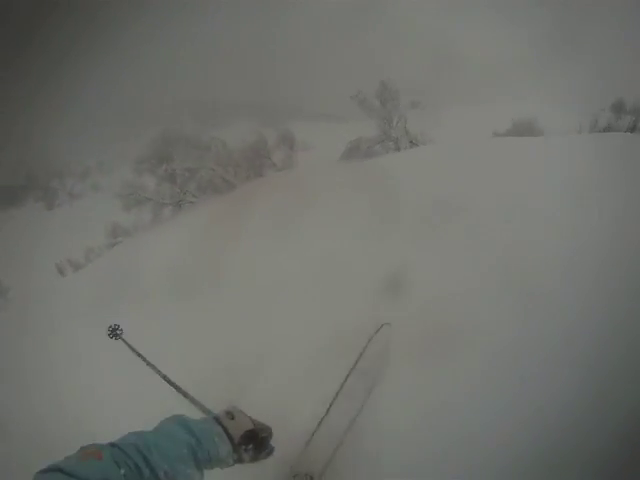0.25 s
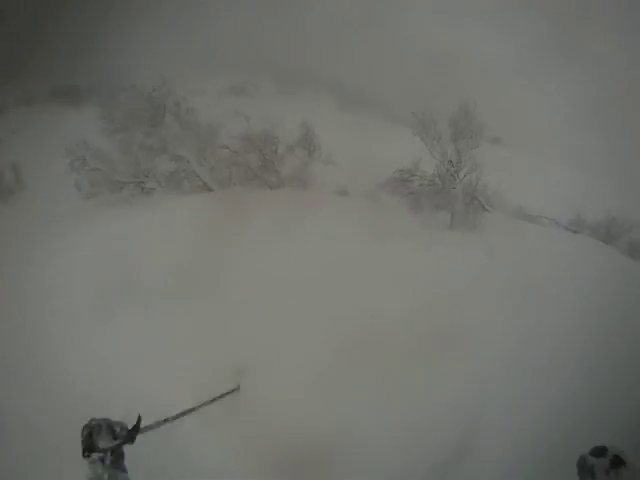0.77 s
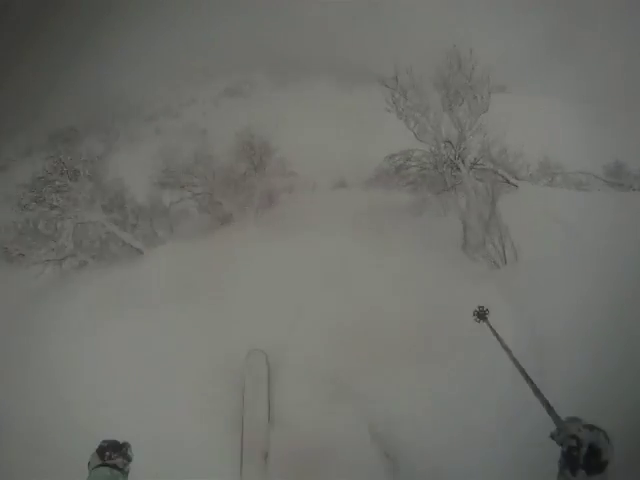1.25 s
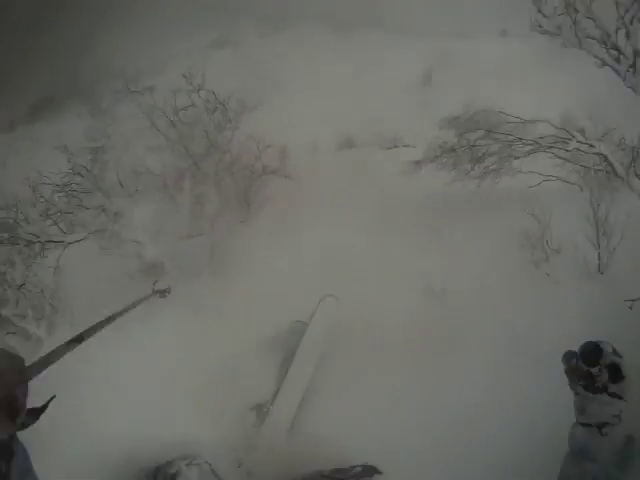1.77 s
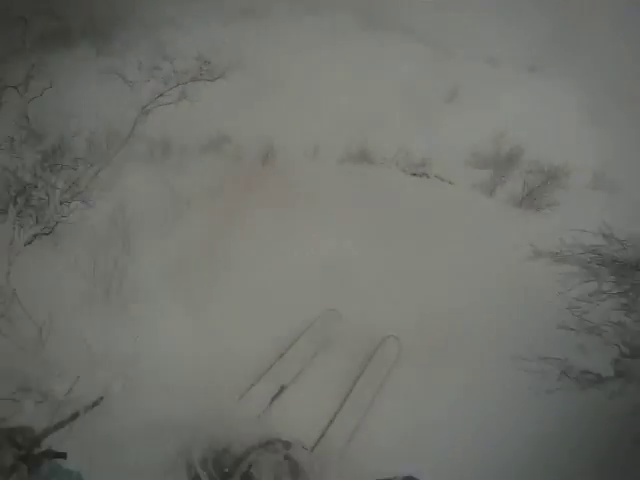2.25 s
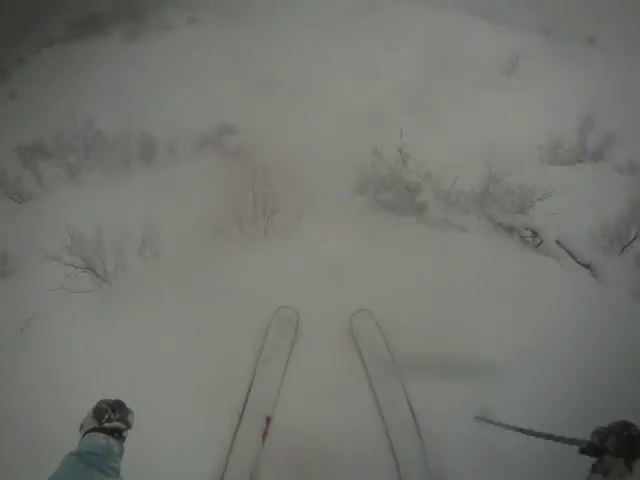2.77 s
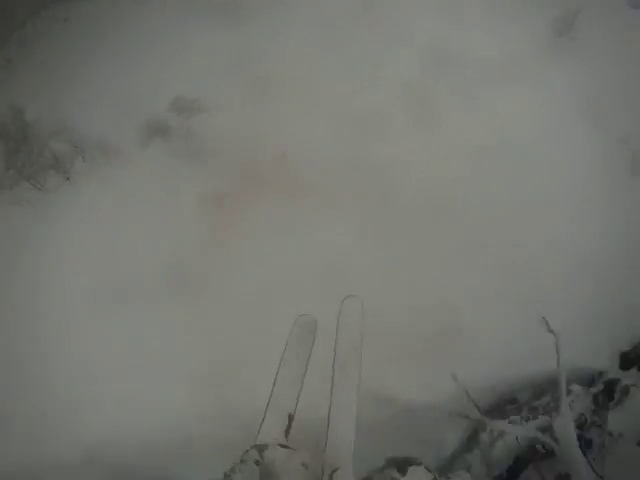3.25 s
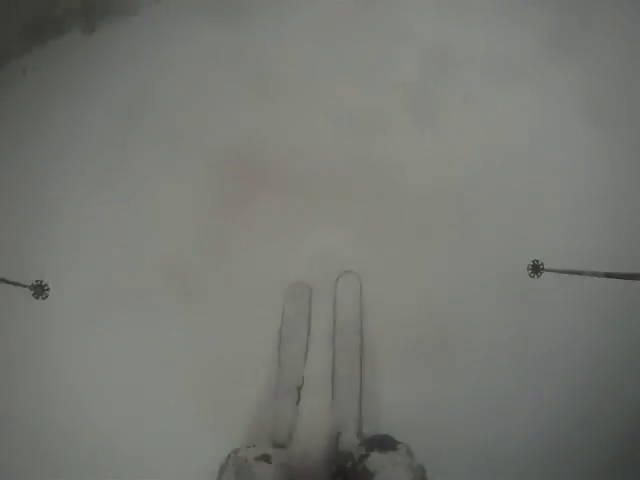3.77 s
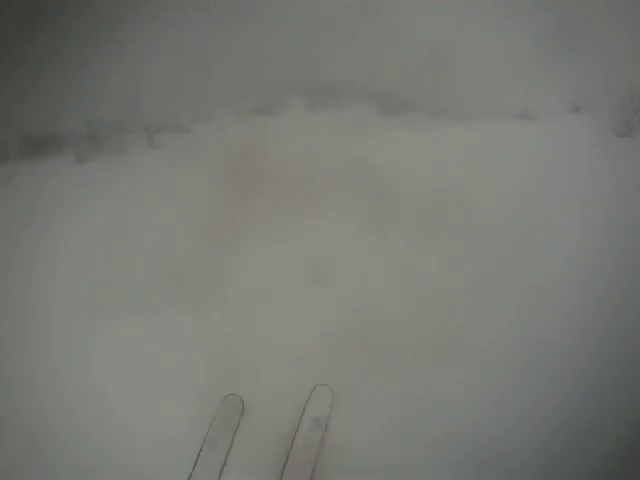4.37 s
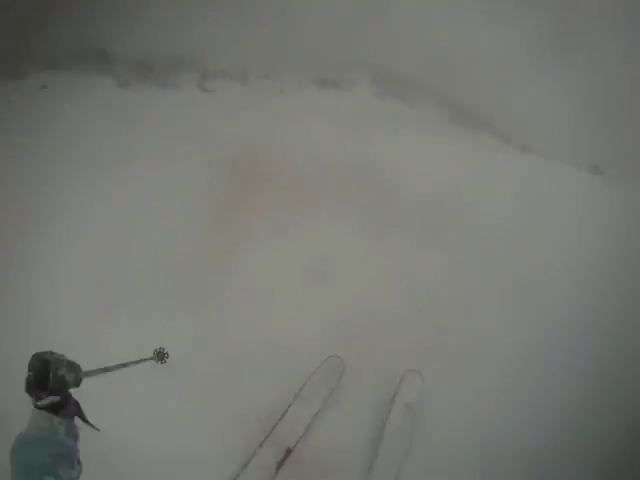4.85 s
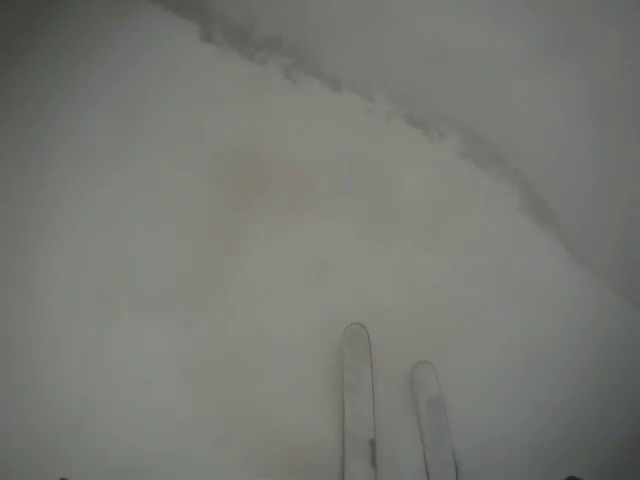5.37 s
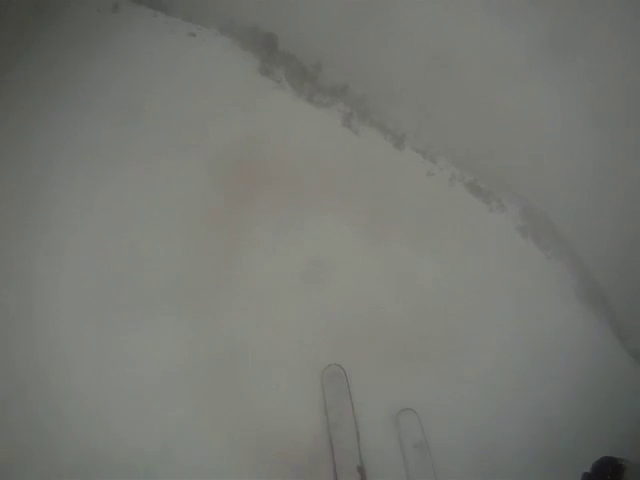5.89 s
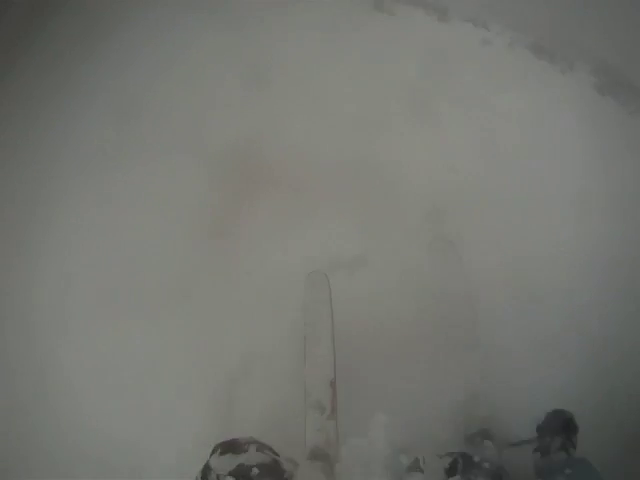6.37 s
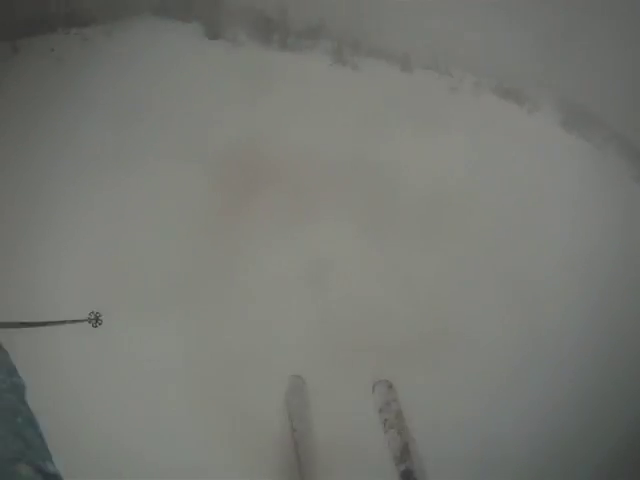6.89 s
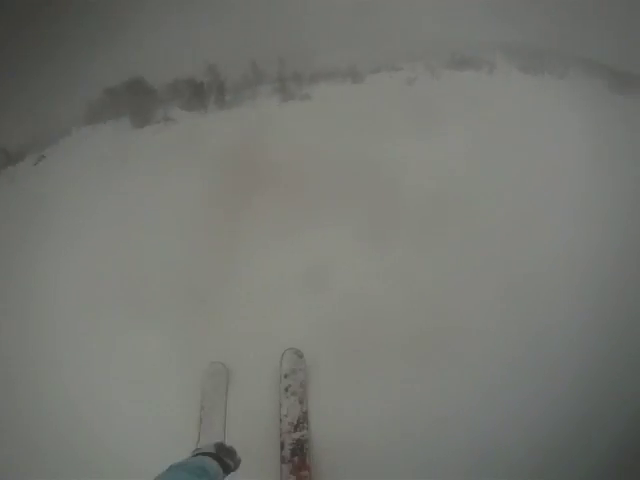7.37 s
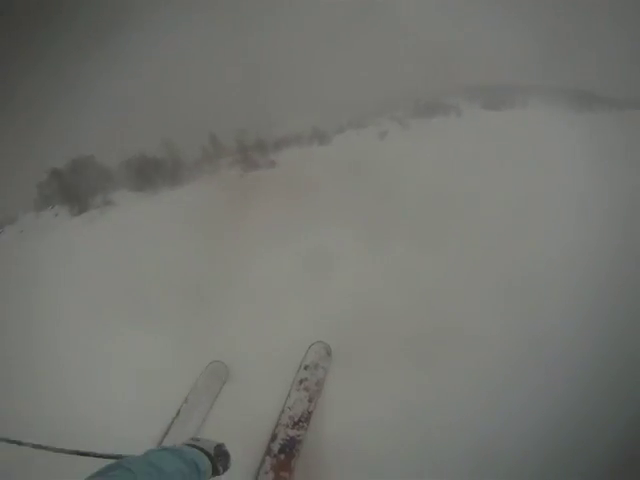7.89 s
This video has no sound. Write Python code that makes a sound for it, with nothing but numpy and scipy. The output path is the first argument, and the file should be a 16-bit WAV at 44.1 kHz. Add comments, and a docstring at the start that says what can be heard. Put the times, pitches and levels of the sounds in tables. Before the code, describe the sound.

A downhill ski run in deep powder, heard by a microphone sealed in a plastic case. Thin swishes of snow and scattered ticks come first over a low wind rumble. Gusts swell and a few low thumps knock through, then the spray becomes a dense, crackling hiss with louder clumps tapping the hollow plastic. Rushing wind and pattering snow carry on to the end.

```python
"""Powder skiing, camera in a sealed plastic housing.

Flying snow patters on the housing as a fine hiss with harder clumps, thicker as the speed builds.
Each impact rings the wall's modes; in one hard turn the snow comes mostly from the side.
Wind rumbles round the case, gusts buffet it, and bumps in the slope thump through the mount."""
import sys
import numpy as np
from scipy import signal
from scipy.fft import rfft, irfft, next_fast_len
from scipy.io import wavfile
from scipy.ndimage import uniform_filter1d

SR = 44100
rng = np.random.default_rng(int(sys.argv[2]) if len(sys.argv) > 2 else 0)


def generate_wav(sig):
    """Save sig (samples, or channels by samples) to the path in sys.argv[1] as 16-bit PCM at SR."""
    pcm = np.round(np.clip(np.atleast_2d(sig).T, -1, 1) * 32767).astype(np.int16)
    wavfile.write(sys.argv[1], SR, pcm)


N = 358533
TIME = np.arange(N) / SR


def from_db(db):
    """Decibels to gain."""
    return 10 ** (np.asarray(db) / 20)


def unit_rms(x):
    """Scale to rms 1."""
    return x / np.sqrt(np.mean(x ** 2) + 1e-20)


def steady(x, span_s):
    """Hold the running rms near 1."""
    return x / np.sqrt(np.abs(uniform_filter1d(x ** 2, int(span_s * SR))) + 1e-12)


def curve(rows):
    """Breakpoints interpolated to every sample."""
    return np.interp(TIME, *np.transpose(rows))


def swell(t, hold_s, attack_s, release_s):
    """Trapezoid: reach 1 at t, hold, fall to 0."""
    return np.interp(TIME, [t - attack_s, t, t + hold_s, t + hold_s + release_s], [0, 1, 1, 0])


def butter(x, hz, kind, order=2):
    """Causal low-, high- or band-pass."""
    return signal.sosfilt(signal.butter(order, np.clip(hz, 5, .45 * SR), kind, fs=SR, output="sos"), x)


def bell(hz, width_hz, db):
    """Peaking biquad; a dip if db is negative."""
    g = from_db(db / 2)
    w = np.tan(np.pi * width_hz / SR)
    c = -2 * np.cos(2 * np.pi * hz / SR)
    return np.array([1 + w * g, c, 1 - w * g, 1 + w / g, c, 1 - w / g]) / (1 + w / g)


def drift(per_s):
    """Random wander, rms 1."""
    steps = rng.standard_normal(8192)
    return unit_rms(np.interp(TIME * per_s, np.arange(len(steps)), steps))


def noise(spectrum):
    """Coloured noise, rms 1."""
    hz, db = np.transpose(spectrum)
    size = next_fast_len(N)
    bins_hz = np.maximum(np.fft.rfftfreq(size, 1 / SR), 1)
    gain = from_db(np.interp(np.log(bins_hz), np.log(hz), db, left=-120, right=-120))
    return unit_rms(irfft(rfft(rng.standard_normal(size)) * gain, size)[:N])


def grains(per_s, spread_db, cap):
    """Random impacts, many small and a few large."""
    sizes = from_db(spread_db * np.minimum(rng.exponential(1, N), cap))
    return sizes * rng.choice([-1, 1], N) * (rng.random(N) < per_s / SR)


# Hiss spectrum: f/Hz, density/dB
HISS_SPECTRUM = [(100, -32), (700, -2), (2000, -6), (6000, -21.5), (15500, -15)]

def mic_hiss(level_db=-70):
    """The microphone's own noise."""
    return from_db(level_db) * noise(HISS_SPECTRUM)


# Skis dig in; skis go light: t/s, hold/s, spray/dB, rush/dB, rumble/dB
SKI_PLOUGHS = [(.1, .1, -0.5, 4.5, 1), (1.04, 0.16, 4, -2, 8), (2.184, .07, 2.5, 2.5, 7),
               (2.397, 0.095, 7, -5, 11), (3.144, .08, 1, 0.5, 9.5), (3.775, 0.05, 3, 8.5, 8),
               (4.116, 0.099, 3.5, 5.5, 7.5), (4.547, 0.064, 0.5, 1.5, 8), (5.86, 0.084, 1.5, 1, -2.5),
               (6.384, 0.036, 5.5, 6, 12), (6.604, 0.37, 1.5, 0, 5), (7.3, .25, -1, 2, -1.5)]
SKI_LIFTS = [(1.72, 0.023, -1, -2, -4), (2.67, 0.064, 1, 1.5, -12), (3.89, 0.11, -1, 0.5, 2),
             (4.36, 0.062, -2.5, -11, -3.5), (6.447, 0.021, -12.5, -17, 2.5)]

def ski_gains_db():
    """Spray, rush and rumble shift as the skis plough into deeper snow or go light."""
    gains_db = np.zeros((3, N))
    for rows, attack_s, release_s in (SKI_PLOUGHS, 0.011, 0.068), (SKI_LIFTS, 0.0085, 0.07):
        for t, hold_s, *db in rows:
            gains_db += np.outer(db, swell(t, hold_s, attack_s, release_s))
    return gains_db


# Bumps: t/s, level/dB
SLOPE_BUMPS = [(1.558, -26), (1.66, -23.5), (2.401, -16.5), (2.418, -24), (2.457, -34), (2.497, -18.5),
               (2.588, -24.5), (3.184, -22), (4.158, -14), (4.177, -18), (4.562, -35)]
# Mount modes: f/Hz, level/dB, t60/s
MOUNT_MODES = [(68, -15.5, 0.032), (112, 3.5, 0.052), (208, -7.5, 0.032)]

def jolts(gain_db=-3):
    """Bumps under the skis set the mount ringing."""
    out = np.zeros(N)
    for t, db in SLOPE_BUMPS:
        start = int(t * SR)
        age = TIME[:min(SR // 4, N - start)]
        for hz, mode_db, t60_s in MOUNT_MODES:
            decay = from_db(gain_db + db + mode_db - 60 * age / t60_s)
            out[start:start + len(age)] -= decay * np.sin(2 * np.pi * hz * age)
    return out


# Long gusts: t/s, hold/s, gain/dB
LONG_GUSTS = [(1.208, 0.18, 7.5), (1.58, 0.073, 10), (1.968, 0.076, 10), (2.393, 0.54, 7.5),
              (3.146, 0.059, 17.5), (3.294, 0.031, 13.5), (3.79, 0.23, 16.5), (4.13, .12, 10),
              (5.303, 0.37, 2.5), (6.01, 0.04, 10.5), (6.25, 0.054, 10.5)]
# Airflow, following the skier's speed: t/s, level/dB
AIR_LEVEL = [(0.0, -56), (0.7, -64), (1.65, -59.5), (2.56, -50), (2.94, -53.5), (3.55, -43), (4.01, -46),
             (4.5, -40), (4.71, -37.5), (5.64, -43), (6.05, -38.5), (6.43, -46.5), (6.63, -43),
             (6.75, -38.5), (7.4, -38.5), (8.13, -39.5)]
# Wind spectra: f/Hz, density/dB
BUFFET_SPECTRUM = [(10, -1), (20, -6.5), (32, -16.5), (55, -23), (75, -28), (130, -77)]
RUMBLE_SPECTRUM = [(35, 2.5), (65, -2), (98, 3.5), (125, -6), (160, -13), (230, -23.5), (450, -47)]
RUSH_SPECTRUM = [(100, 5.5), (180, -4), (212, 4.5), (250, -1.5), (350, -2.5), (550, -7.5), (900, -9.5),
                 (1600, -15.5), (4000, -46)]

def wind(rush_gain_db, rumble_gain_db, buffet_db=-33.5, rumble_db=-37.5, full_speed_db=-41.5):
    """Large eddies buffet the case, smaller ones rumble in the mount, the finest rush past."""
    air_db = curve(AIR_LEVEL)
    speed_db = air_db - full_speed_db
    gust_db = sum(db * swell(t, hold_s, attack_s=0.039, release_s=0.11) for t, hold_s, db in LONG_GUSTS)
    # low wind grows more slowly with speed than the rush
    buffet = from_db(buffet_db + 0.38 * speed_db + gust_db) * steady(noise(BUFFET_SPECTRUM), 0.24)
    eddies = noise(RUMBLE_SPECTRUM) * from_db(3 * drift(40))
    rumble = from_db(rumble_db + 0.45 * speed_db + rumble_gain_db) * steady(eddies, 0.15)
    rush = from_db(air_db + rush_gain_db + 1.75 * drift(35)) * noise(RUSH_SPECTRUM)
    return buffet + rumble + rush


# Short gusts: t/s, level/dB, rise/s, fall/s, suction lead/s
SHORT_GUSTS = [(3.831, -14, 0.0024, 0.004, 0.022), (3.85, -1, 0.002, 0.0017, 0.00011),
               (5.199, -10.5, 0.005, 0.0082, .005), (6.174, -13.5, 0.0026, 0.0029, -0.0066),
               (6.306, -11, 0.0021, 0.0017, 0.021), (6.44, -4.5, .0012, 0.0068, 0.0013),
               (6.608, -15, 0.0019, .007, 0.0089), (6.804, -13.5, 0.0039, 0.0041, 0.019)]

def slaps(suction_stretch=2.5):
    """A gust slaps the case: one pressure bump with a wider, shallow suction beside it."""
    out = np.zeros(N)
    for t, db, rise_s, fall_s, lead_s in SHORT_GUSTS:
        near = np.abs(TIME - t) < .1
        age = TIME[near] - t
        bump = np.exp(-(age / np.where(age < 0, rise_s, fall_s)) ** 2 / 2)
        suction_s = suction_stretch * (rise_s + fall_s)
        suction = np.exp(-2 * ((age + lead_s) / suction_s) ** 2) / suction_stretch
        out[near] += from_db(db) * (bump - suction)
    return out


# Housing peaks and dips, struck from front or side: f/Hz, width/Hz, gain/dB
FRONT_MODES = [(1410, 440, 10.5), (2113, 740, 9.5), (3545, 480, 9.5), (5020, 290, 4), (6020, 515, -17.5),
               (6900, 720, 4.5), (8420, 390, 11), (10110, 1720, 13.5), (11840, 3080, -17),
               (14080, 2420, 18)]
SIDE_MODES = [(1490, 460, 9), (2170, 670, 9.5), (3700, 310, 10), (5240, 370, 4.5), (6250, 800, -10),
              (7220, 300, 8.5), (8780, 280, 12.5), (10480, 390, 13), (12030, 850, -3), (14590, 1500, 13)]

def housing(force, modes=FRONT_MODES, wall_hz=2500):
    """The plastic wall dulls the top and rings briefly in its modes."""
    dulled = butter(force + 1e-18, wall_hz, "low", order=1)
    return signal.sosfilt([bell(*mode) for mode in modes], dulled)


def side_share():
    """Share of the snow that comes from the side in the hard turn."""
    return 0.79 * swell(t=5.83, hold_s=1.2, attack_s=0.013, release_s=0.013)


# Thin sheets of powder: t/s, hold/s, level/dB
POWDER_SHEETS = [(0.018, .11, -46), (0.303, 0.037, -39.5), (0.425, 0.069, -48.5), (0.934, 0.031, -57.5),
                 (1.12, 0.064, -61), (1.27, .025, -59), (1.545, 0.077, -52), (1.855, 0.14, -52),
                 (2.02, 0.034, -55), (2.204, 0.089, -54)]

def swishes(band_hz=(3900, 8100)):
    """Fine powder is all tiny grains, so it excites mainly the upper modes."""
    level = sum(from_db(db) * swell(t, hold_s, attack_s=0.013, release_s=0.011)
                for t, hold_s, db in POWDER_SHEETS)
    force = butter(grains(per_s=2500, spread_db=9, cap=5.3), band_hz, "band", order=1)
    return level * unit_rms(housing(force))


def dust(flurry_db=1.16, puff_s=0.0023, puff_weight=0.67):
    """Countless crystals; loose flakes burst on the wall in sudden, decaying puffs."""
    bursts = np.abs(grains(per_s=70, spread_db=2, cap=1.7)) + 1e-18
    puffs = signal.lfilter([1], [1, -np.exp(-1 / (puff_s * SR))], bursts)
    envelope = np.sqrt(1 + puff_weight * unit_rms(puffs) ** 2) * from_db(flurry_db * drift(30))
    return unit_rms(grains(per_s=16000, spread_db=3.5, cap=5.3) * envelope)


def crumbs(per_s, fineness, bunching_db=2.5, knee_hz=4200, bands=16):
    """Crumbs come in bunches; size sets contact time and so pitch, finer snow ringing higher."""
    out = np.zeros(N)
    band_per_s = per_s / bands * from_db(bunching_db * drift(25))
    for hz in np.geomspace(950, 13000, bands):
        # hits are strongest at the knee; lower ones fade steeply, higher ones gently
        strength = min(hz / knee_hz, 1) ** fineness / hz ** 0.42
        hits = grains(band_per_s, spread_db=4, cap=2.2) * strength + 1e-18
        out += butter(hits, [hz / 1.3, hz * 1.3], "band") + 0.15 * hits
    return steady(out, 0.22)


# Spray thickness: t/s, level/dB
SPRAY_LEVEL = [(0.0, -48), (0.25, -46.5), (0.84, -59), (1.27, -53), (1.61, -52.5), (2.62, -45.5),
               (2.74, -47), (3.55, -38), (3.67, -35), (4.03, -38), (4.57, -34), (5.21, -31.5),
               (5.48, -34.5), (6.11, -34.5), (6.47, -39.5), (6.86, -37.5), (7.58, -33), (8.13, -36)]
# Texture by thickness: level/dB, graininess/0-1, crumb rate/(1/s), fineness (slope exponent)
SPRAY_TEXTURE = [(-45, 0.74, 210, 2.1), (-45.5, 0.62, 260, 1.36), (-34, 0.25, 360, 1.65)]

def spray(snow_db, dust_db=2.5, crumb_db=-1, gain_db=1.5):
    """Dust and crumbs strike the housing from the front, and from the side in the turn."""
    thickness_db = curve(SPRAY_LEVEL)
    points_db, *columns = np.transpose(SPRAY_TEXTURE)
    graininess, per_s, fineness = [np.interp(thickness_db, points_db, column) for column in columns]
    fine = from_db(dust_db) * np.sqrt(1 - graininess) * dust()
    coarse = from_db(crumb_db) * np.sqrt(graininess) * crumbs(per_s, fineness)
    force = butter(fine + coarse, 440, "high", order=1)
    side = side_share()
    shell = np.sqrt(1 - side) * housing(force) + np.sqrt(side) * housing(force, SIDE_MODES)
    return from_db(snow_db + gain_db) * shell


def small_clumps(snow_db, per_s=11, mean_db=-24.5, spread_db=3, low_hz=1430, high_hz=4100, tries=200):
    """Random rows like BIG_CLUMPS; they stand out most from a thin spray."""
    level_db = mean_db + 0.82 * (snow_db - snow_db.mean())
    rows = []
    for when, size, pitch, chance in rng.random((tries, 4)):
        if chance < per_s * N / SR / tries:
            db = level_db[int(when * N)] + spread_db * (2 * size - 1)
            hz = low_hz * (high_hz / low_hz) ** pitch
            rows.append((when * N / SR, db, hz, 5, 0))
    return rows


# Big snow clumps: t/s, level/dB, ring f/Hz, ring boost/dB, thud boost/dB
BIG_CLUMPS = [(0.15, -19.5, 2050, 6, -12), (0.192, -15.5, 1340, 5, 8), (0.2794, -15.5, 3620, 16.5, 10),
              (0.335, -21, 1360, -2, 1), (0.5528, -17.5, 1950, 5, -9), (0.6964, -19, 2770, 17, -27),
              (0.7788, -28.5, 1420, -11, -18), (1.0547, -28, 2880, 15, -7), (1.1153, -26.5, 4700, 19, 6),
              (1.5583, -23.5, 1380, 10, 19), (1.5673, -23, 2140, 9, 5), (1.659, -25.5, 1830, 4, -4),
              (1.7473, -30, 3330, 16, -2), (2.096, -24, 1410, 7, 1), (2.1958, -26.5, 2220, 13, 7),
              (2.2642, -23.5, 1320, 5, -20), (2.3995, -14, 1270, 1, 6), (2.4945, -22, 3580, 8, 13),
              (2.546, -20, 3920, 13.5, 11), (2.7338, -20.5, 2740, 12.5, 3), (2.867, -22.5, 1390, -2, 6),
              (3.037, -20.5, 2000, -4, 5), (3.056, -22, 3970, 5, -2), (3.2685, -21, 3400, 9, 8),
              (3.3163, -21, 1300, 16, 26), (3.4993, -15.5, 1960, 9, 12), (3.7161, -15, 1990, -14, -6),
              (3.761, -12, 1410, 3, 9), (3.784, -12.5, 3480, 13, 5), (4.1555, -8.5, 1360, 10.5, 3),
              (4.1817, -11, 2180, 5, 10), (4.317, -3.5, 2090, 14, 9), (4.4327, -18, 1960, 3, -3),
              (4.4892, -14.5, 3680, 9, 1), (4.561, -12.5, 2110, 12, 0), (4.6543, -13, 1380, 7, 9),
              (4.7595, -11, 1970, 9, 3), (4.9307, -10, 3500, 12, 4), (5.1574, -8, 2300, 9, -6),
              (5.2674, -3, 3500, 9.5, 7.5), (5.3185, -6, 1850, 6, -2), (5.4843, -10, 2160, 9, 2),
              (5.64, -7, 2110, 7.5, -8), (5.7152, -10.5, 1990, 1, -2), (5.8389, -12.5, 2140, 15, 14),
              (5.883, -9.5, 2230, 13.5, 10), (5.9198, -10.5, 2260, 9, 2), (5.9607, -9.5, 980, 19.5, -1),
              (6.566, -14, 2290, 5, -7), (6.6853, -12.5, 3550, 11.5, 2), (6.8421, -11.5, 1430, -8, -13),
              (7.0711, -14.5, 1420, 6, -8), (7.1191, -13.5, 1420, 11.5, 10), (7.2313, -10.5, 1520, 0, -11),
              (7.3256, -12, 1430, -3, -11), (7.277, -15, 3500, 5, 9), (7.7511, -6, 3260, 7.5, -10),
              (7.9486, -5, 2060, 8.5, -4)]

def clumps(snow_db, crumble_s=0.0015, delay_s=0.001066, gain_db=0.5, samples=2048):
    """A clump lands with one push and crumbles; soft ones thud, icy ones crack."""
    out = np.zeros(N + 2 * samples)
    side = side_share()
    rows = list(BIG_CLUMPS) + small_clumps(snow_db)
    debris = rng.standard_normal((200, samples))
    for (t, db, hz, ring_db, thud_db), bits in zip(rows, debris):
        force = 0.22 * butter(bits, 2300, "high", order=1) * np.exp(-TIME[:samples] / crumble_s)
        force[0] += 1  # the push
        force = butter(force, 6.6 * hz, "low", order=1)  # low-ringing clumps touch for longer
        crack_db = 1 + 7 * np.log2(hz / 2000)  # high-ringing clumps are icy
        colour = [bell(hz, 0.24 * hz, ring_db), bell(370, 1020, thud_db), bell(8000, 9700, crack_db)]
        modes = SIDE_MODES if side[int(t * SR)] > .5 else FRONT_MODES
        hit = butter(housing(signal.sosfilt(colour, force), modes), 87, "high")
        start = int((t + delay_s) * SR)
        out[start:start + samples] += from_db(db + gain_db) * hit / np.abs(hit).max()
    return out[:N]


def scene():
    """Everything reaches one microphone inside the housing."""
    spray_gain_db, rush_gain_db, rumble_gain_db = ski_gains_db()
    snow_db = curve(SPRAY_LEVEL) + spray_gain_db
    snow = spray(snow_db) + swishes() + clumps(snow_db)
    air = wind(rush_gain_db, rumble_gain_db) + slaps()
    return (mic_hiss() + jolts() + air + snow)[None]


def record(dry, cutoff_hz=15500):
    """Steep elliptic low-pass."""
    return signal.sosfilt(signal.ellip(10, .1, 80, cutoff_hz, fs=SR, output="sos"), dry)


dry = scene()
out = record(dry)
generate_wav(out)
```